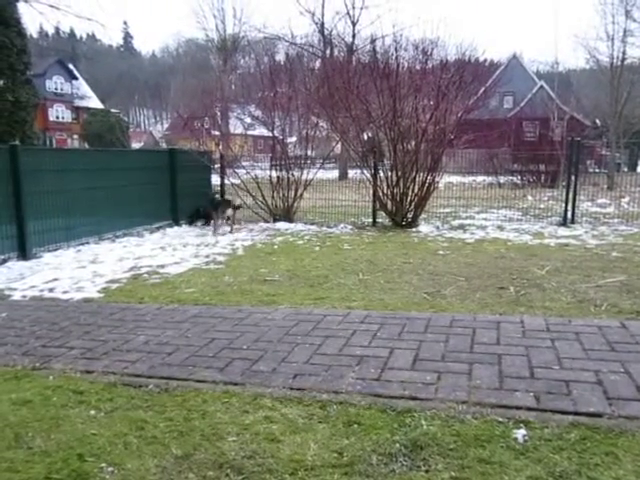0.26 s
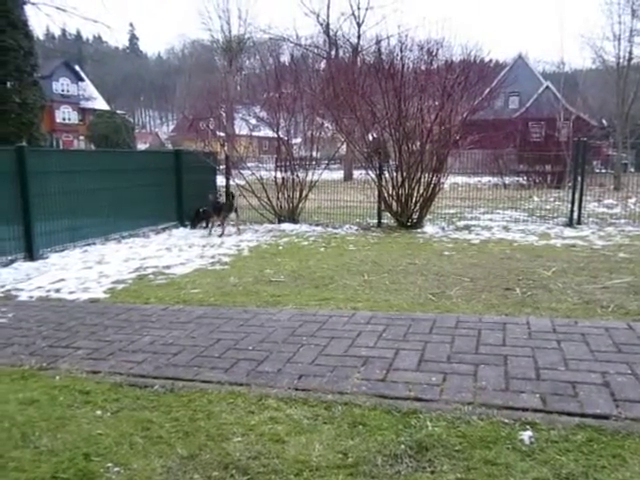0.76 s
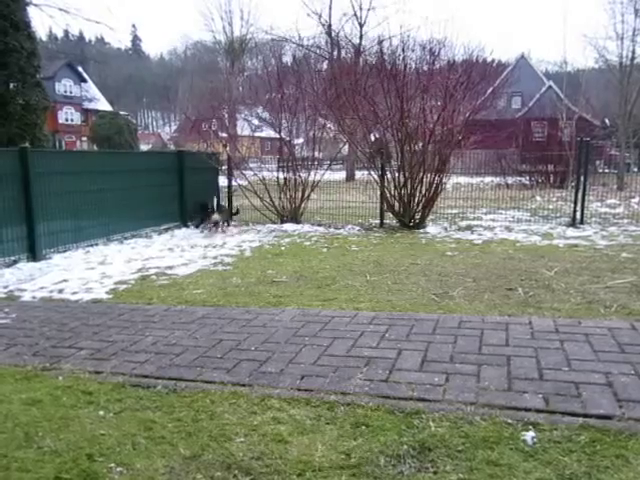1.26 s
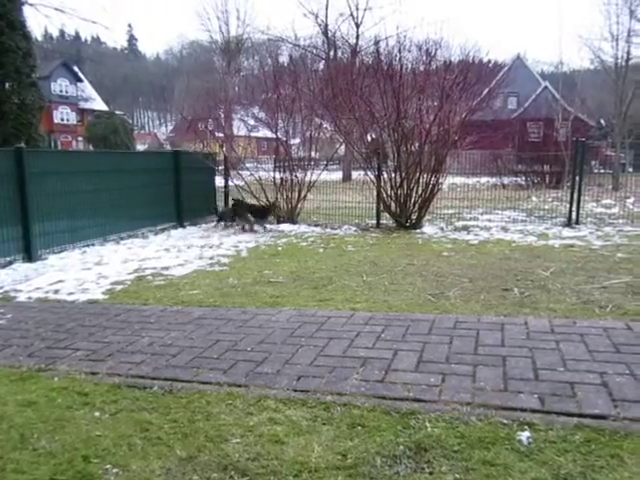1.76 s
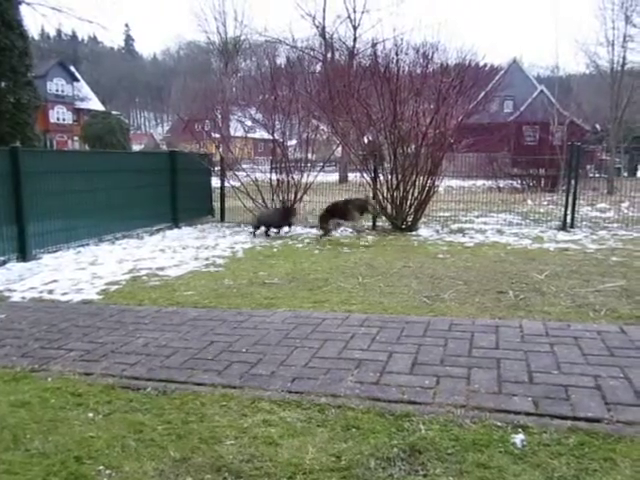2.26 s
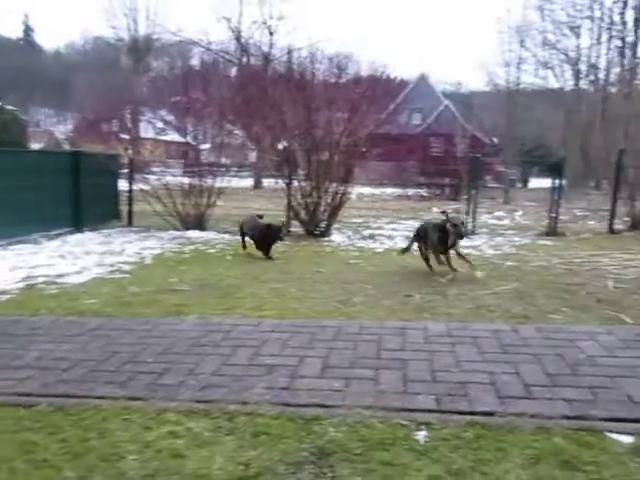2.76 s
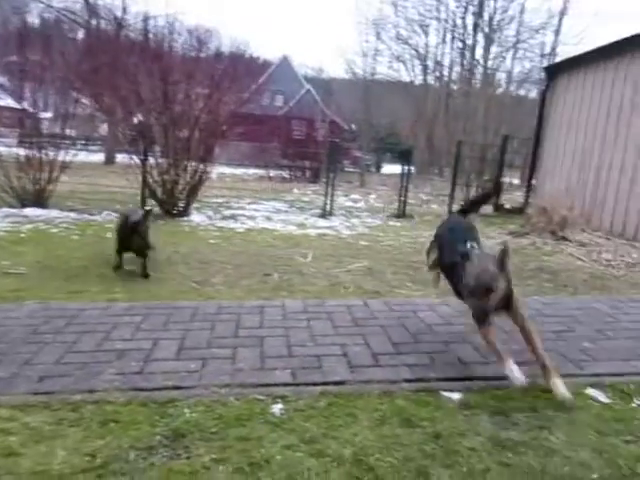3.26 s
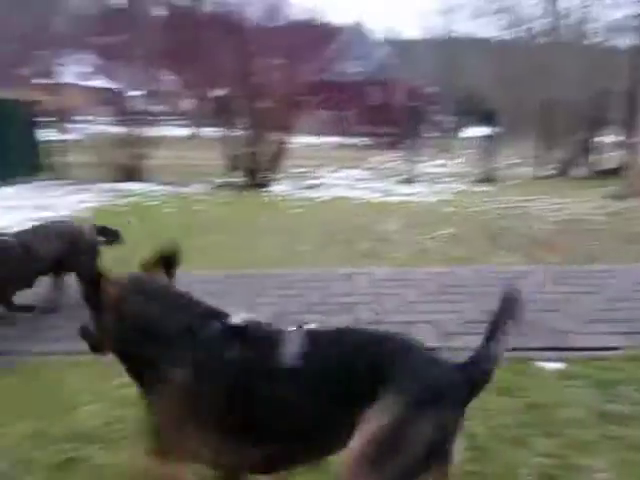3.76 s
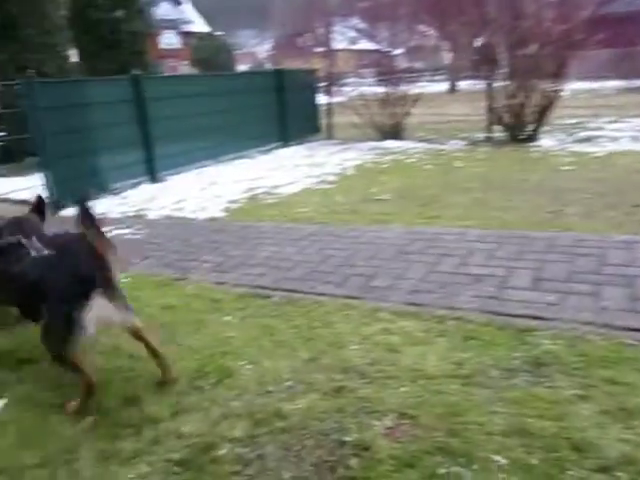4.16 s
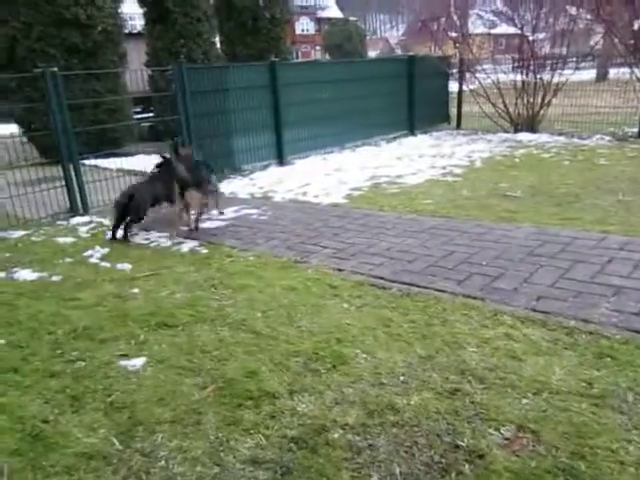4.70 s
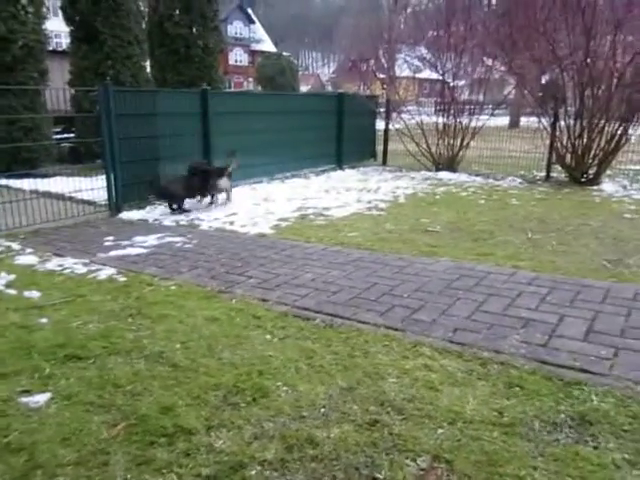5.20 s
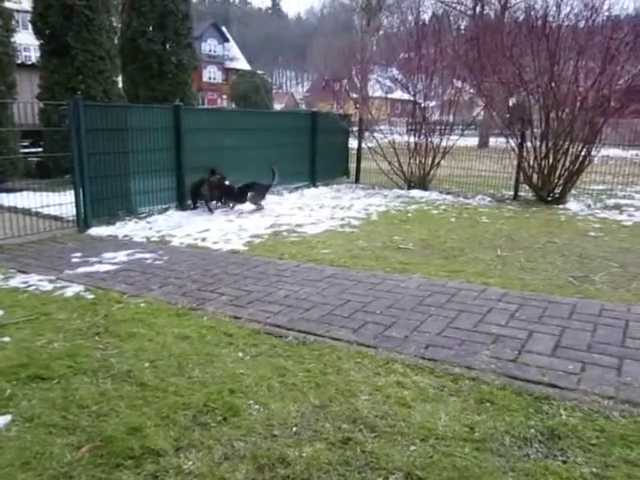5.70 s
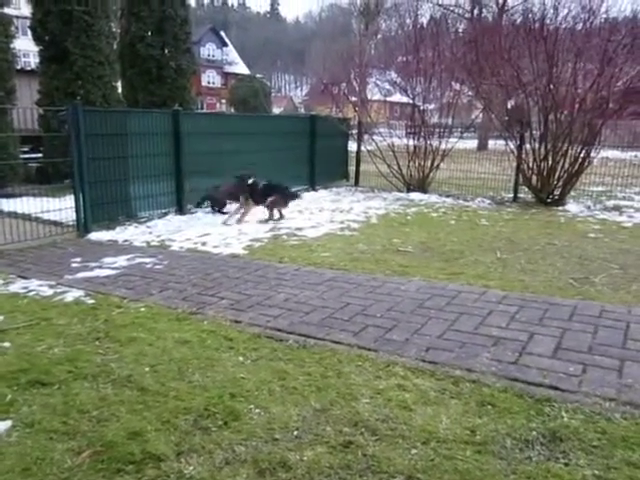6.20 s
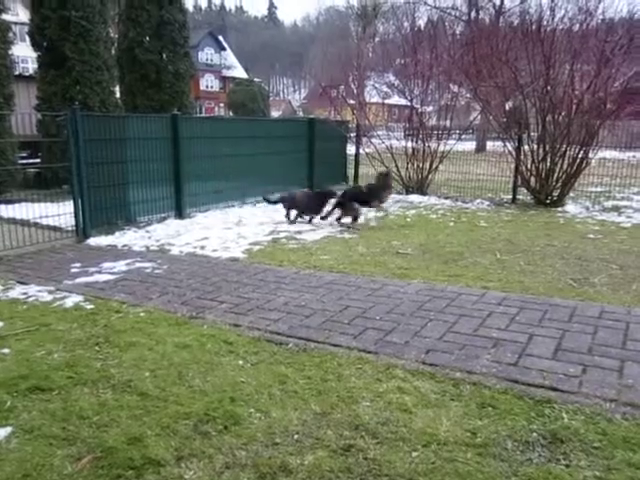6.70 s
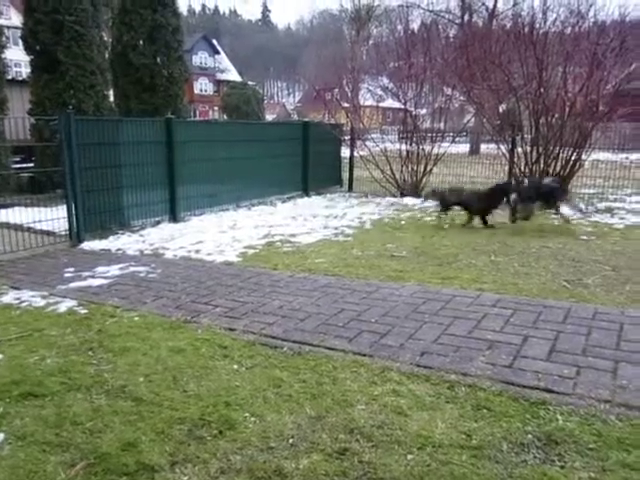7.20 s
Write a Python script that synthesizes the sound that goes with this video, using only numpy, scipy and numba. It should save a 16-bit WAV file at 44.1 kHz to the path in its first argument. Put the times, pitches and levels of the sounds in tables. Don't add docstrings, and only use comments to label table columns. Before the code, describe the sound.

Outdoors, a small stereo microphone picks up low wind rumble and faint town hiss, with occasional thin sparrow whistles. Dogs thump and growl in turn, then gallop nearer with crackling steps, skids and tinkling collar tags, one hard click striking the microphone itself. After the close pass come a short bark, raspy open-mouthed growls, a long fading growl and several gruff barks, the last one strong, amid continuing crunchy scuffling.

```python
import sys
import numpy as np
from scipy import signal
from scipy.fft import rfft, irfft
from scipy.io import wavfile
from scipy.ndimage import uniform_filter1d
from numba import njit

SR = 44100
rng = np.random.default_rng(int(sys.argv[2]) if len(sys.argv) > 2 else 0)


def how_loud(loudness_db):
    steps = np.asarray(loudness_db, float) / 20
    return 10 ** steps


def master_out(mix):
    frames = np.transpose(np.atleast_2d(mix))
    ceiling = np.clip(frames, -1, 1)
    pcm = np.round(ceiling * 32767).astype(np.int16)
    wavfile.write(sys.argv[1], SR, pcm)


N = 328525
T = np.arange(N) / SR
PORT_LAG = 1.25

# start in seconds, tag peak in dB, upper tag ring in dB relative to it, paw crunch in dB.
LANDINGS = [(0.2848, -34, -13, -42), (0.316, -25.5, -6, -39), (0.361, -25, 1, -36), (2.0297, -27, -8, -32),
            (2.247, -30, -3, -35), (2.272, -28.5, -8, -39), (2.368, -46, -8, -37), (2.5565, -27.5, -6, -33),
            (2.885, -40, -6, -34), (3.085, -47, -6, -33), (3.3, -17, -13, -40), (3.317, -22, -7, -42),
            (3.6067, -24.5, -1, -40), (4.04, -41, -12, -50), (4.192, -32, -16, -35), (4.351, -46, 3, -24),
            (4.7997, -36, 4, -29), (4.857, -32, 8, -27.5), (5.109, -27, 8, -34), (5.204, -29, 3, -31.5),
            (5.334, -32, 3, -30), (5.4186, -23, 6, -31), (5.51, -30.5, -13, -46), (5.6002, -23, -17, -47),
            (5.761, -21, -7, -23), (5.854, -30.5, -18, -35), (6.629, -36, -5, -33), (6.946, -36, -15, -39),
            (7.3239, -34.5, -2, -49)]
# frequency in Hz, level in dB per Hz.
RUSTLE = [(180, -61), (300, 4), (637, -41), (861, -8), (1570, -10.5), (8100, -8.5), (12100, -1.5),
          (15000, -7), (16400, -8)]


@njit
def svf(x, hz, width):
    y, b, l = np.empty(len(x)), 0., 0.
    for i in range(len(x)):
        g, k = np.tan(np.pi * hz[i] / SR), width / hz[i]
        v = (b + g * (x[i] - l)) / (1 + g * (g + k))
        b, l, y[i] = 2 * v - b, l + 2 * g * v, k * v
    return y


def band(x, hz, width):
    return svf(x, hz * np.ones(len(x)), 1. * width)


def unit(x):
    return x / np.sqrt(np.mean(x ** 2))


def walk(rate, count=N):
    k = int(SR / rate)
    steps = np.repeat(rng.standard_normal(count // k + 1), k)
    return 1.34 * uniform_filter1d(uniform_filter1d(steps, k), k)[:count]


def colour(x, table):
    hz, db = np.transpose(table)
    bins = np.log(np.fft.rfftfreq(N, 1 / SR) + 1)
    return irfft(rfft(x) * how_loud(np.interp(bins, np.log(hz), db)), N)


def spikes(s, size):
    places = np.clip((np.ravel(s) * SR).astype(int), 0, N - 1)
    return np.bincount(places, np.ravel(size), N)


def fade(x, rise, fall):
    falling = signal.lfilter([1], [1, -np.exp(-1 / (fall * SR))], x)
    return uniform_filter1d(falling, int(rise * SR) + 1)


def swells(table):
    return sum(how_loud(db) * np.exp(-(2 * (T - s) / length) ** 2) for s, db, length in table)


def ring(x, modes):
    out = np.zeros(len(x))
    for hz, db, t60 in modes:
        pole = np.exp(2j * np.pi * hz / SR - np.log(1000) / (t60 * SR))
        out += how_loud(db) * signal.lfilter([1], [1, -pole], x).imag
    return out


def built_ring(x, modes, swell_s, share):
    short_modes = [(hz, db, swell_s) for hz, db, _ in modes]
    return ring(x, modes) - share * ring(x, short_modes)


def town():
    # frequency in Hz, level in dB per Hz.
    hiss_tone = [(15, -41), (25, -2), (65, -15), (134, -2), (432, -6), (508, -7), (948, -6), (2730, -16.5),
                 (3880, -17), (5530, -21), (13900, -26.5), (16400, -22)]
    mid, side = (colour(rng.standard_normal(N), hiss_tone) for _ in range(2))
    mixed = np.array([mid + 0.78 * side, mid - 0.73 * side])
    patches = np.zeros((2, N))
    for hz in 45 * 2 ** np.arange(9.):
        drift_db = 1.8 * walk(3.956)
        patches += how_loud(drift_db) * np.array([band(x, hz, hz * 1.3) for x in mixed])
    whine = how_loud(-74) * np.sin(2 * np.pi * 15734 * T)
    return how_loud(-41.5) * unit(patches) + whine


def wind():
    # middle in seconds, level in dB, length in seconds.
    gusts = [(.1, -46, 0.68), (.45, -43, 0.22), (1.37, -52, 0.31), (1.8, -53, 0.32), (2.08, -36, 0.15),
             (2.45, -38, 0.097), (2.9, -55, 0.64), (4.15, -43, 0.48), (5.0, -51, 0.71), (5.83, -55, 0.11),
             (6.27, -56, .15), (7.0, -50, 1.4)]

    def rumble():
        centre = 62 * (1 + 0.064 * walk(3.3))
        return unit(band(band(rng.standard_normal(N), centre, 65), 75.0, 85))

    mid, side = rumble(), rumble()
    strength = (how_loud(-51) + swells(gusts)) * how_loud(2 * walk(14))
    return strength * np.array([mid + 0.43 * side, mid - 0.11 * side])


def crackle(spread_db, share):
    size_db = spread_db * np.minimum(rng.exponential(size=N), 5)
    grains = (rng.random(N) < share) * how_loud(size_db) * rng.standard_normal(N)
    return unit(unit(grains) + 1.38 * rng.standard_normal(N))


def rustle():
    # time in seconds, level in dB.
    scuffle = [(0.0, -55), (0.83, -88), (1.26, -61.5), (2.03, -54.5), (2.4, -53.5), (2.9, -61.5),
               (3.38, -53), (3.66, -52.5), (3.71, -43), (3.9, -43.5), (4.0, -49), (4.71, -47), (5.04, -51),
               (5.91, -49.5), (6.06, -57.5), (6.74, -46.5), (7.16, -59.5), (7.45, -53.5)]
    # middle in seconds, level in dB, length in seconds.
    skids = [(1.919, -46.5, 0.11), (2.16, -44, 0.059), (2.328, -41.5, 0.062), (2.8, -42, 0.035),
             (2.937, -41, 0.072), (4.81, -41, 0.018), (5.16, -36.5, 0.06), (5.786, -34, 0.081),
             (6.15, -40.5, 0.057), (6.295, -46, 0.043), (6.893, -45, 0.027)]
    scuffle_db = np.interp(T, *np.transpose(scuffle))
    scrapes = how_loud(scuffle_db + 7 + 3.2 * walk(40))
    return (scrapes + swells(skids)) * unit(colour(crackle(4.6, .08), RUSTLE))


def tags():
    # start in seconds, peak in dB, upper ring in dB relative to it.
    chinks = [(0.0992, -35, -12), (2.0358, -19, -10), (3.289, -30, -6), (3.334, -40, -8),
              (3.614, -32.5, -8), (3.7913, -7.5, -5), (3.809, -11, -4), (3.833, -21, -2), (3.9908, -35, -2),
              (4.214, -26, -12), (4.2183, -21, -20), (4.2522, -34, -16), (6.6453, -30, -2),
              (6.89, -35, -15)]
    # frequency in Hz, level in dB, time to fall by 60 dB in seconds.
    main_modes = [(9920, 1, .052), (9850, -9, .04), (5900, -20, .05), (11600, -28, .05)]
    # Hz, dB, seconds.
    upper_modes = [(13400, 4.5, .04), (13300, -3, .03), (13520, -6, .03)]
    s, db, upper_db = np.transpose([row[:3] for row in LANDINGS] + chinks)
    chance = rng.random((len(s), 2, 3))
    gaps = .006 + .012 * chance[:, 0]
    times = np.c_[s, s[:, None] + np.cumsum(gaps, axis=1)]
    sizes = how_loud(db)[:, None] * np.c_[np.ones(len(s)), .35 * chance[:, 1]]
    upper_sizes = sizes * how_loud(upper_db)[:, None]
    main = built_ring(spikes(times, sizes), main_modes, swell_s=.014, share=.7)
    upper = built_ring(spikes(times, upper_sizes), upper_modes, swell_s=.014, share=.7)
    spun = main * how_loud(2 * walk(120)) + upper * how_loud(2 * walk(120))
    return band(spun, 9100, 24000)


def paws():
    # start in seconds, peak in dB, dull part in dB relative to it.
    steps = [(0.45, -45, -6.5), (1.909, -39.5, -1), (1.739, -37, -26), (2.1326, -41, -16),
             (2.387, -28, -33), (2.466, -31.5, -9.5), (2.678, -29.5, -13.5), (3.0132, -32, -16),
             (3.066, -36.5, -5), (3.1876, -33, -29), (3.48, -44.5, 5.5), (3.648, -46.5, -1),
             (3.6892, -39, -23), (3.703, -27, -23), (3.7356, -24, -15.5), (3.7894, -19.5, -29),
             (3.849, -24, -38), (3.876, -23, -42), (3.919, -28.5, -12), (4.011, -31, -36),
             (4.2125, -36, -30), (4.2524, -51, -25), (4.67, -31.5, -10), (4.682, -27, -24),
             (4.75, -27.5, -16), (4.9443, -38, -33), (4.955, -35, -37), (4.9848, -40, -39),
             (5.041, -29, -24), (5.0905, -33, -7.5), (6.094, -32, -19), (6.5492, -27.5, -34),
             (6.645, -24, -25), (6.853, -28.5, -21), (6.868, -28, -31)]
    landing_dull_db = -15.5
    s, db, dull_db = np.transpose(steps + [(s, db, landing_dull_db) for s, _, _, db in LANDINGS])
    hits = spikes(s, how_loud(db))
    crack_and_crunch = fade(hits, 0.0025, 0.0036) + how_loud(-9) * fade(hits, 0.0096, 0.0076)
    crisp = crack_and_crunch * unit(colour(crackle(4.2, 0.069), RUSTLE[3:]))
    dull_envelope = fade(spikes(s, how_loud(db + dull_db)), 0.0028, 0.045)
    dull = dull_envelope * unit(band(rng.standard_normal(N), 3040, 1800))
    return how_loud(1.0) * crisp + how_loud(-0.5) * dull


def thuds():
    # start in seconds, peak in dB, pitch in Hz. The rows from 1.335 to 1.385 s are a low band of the
    bumps = [(0.325, -31, 350), (0.357, -29.5, 366), (0.392, -25, 285), (0.449, -26.5, 1020),
             (0.498, -50, 293), (1.335, -17, 265), (1.36, -17, 260), (1.385, -13, 265), (1.91, -28, 700),
             (2.043, -23, 358), (2.88, -28.5, 1640), (3.079, -26, 320), (3.481, -27.5, 395),
             (3.618, -34, 1050), (3.754, -25.5, 345), (3.896, -26, 870), (4.368, -36, 865),
             (6.154, -27, 475), (6.795, -27, 293)]
    s, db, hz = np.transpose(bumps)
    latest = np.clip(np.searchsorted(s, T + .01) - 1, 0, None)
    noise = unit(band(rng.standard_normal(N), hz[latest], 170))
    return how_loud(-8.5) * fade(spikes(s, how_loud(db)), 0.00035, 0.014) * noise


def sparrows():
    # time in seconds, pitch in Hz, level in dB.
    chirrup = [(0, 3400, 4), (.03, 4610, 12), (.06, 3400, 8), (.07, 3774, 14), (.087, 3550, 12),
               (.11, 4154, 7.5), (.127, 3320, 13.5), (.137, 3900, 19), (.165, 3800, -28)]
    cheep = [(0, 4810, 8), (.02, 4665, 18), (.04, 4330, 21.5), (.07, 4250, 2), (.09, 4010, -23)]
    peep = [(0, 3330, -12), (.03, 3290, 12), (.22, 3300, -2.5), (.28, 3330, -16)]
    tswee = [(0, 4205, 13), (.045, 4590, 16), (.075, 4650, -10)]
    arch = [(0, 4080, 16), (.018, 4900, 14), (.035, 5200, 9), (.052, 4050, 13), (.085, 3950, -7)]
    # start in seconds, level in dB, pitch factor, length factor.
    chirrup_calls = [(0.894, -61.5, 1.02, 0.8), (2.4, -49, 1.035, 0.9), (6.757, -57, 1.03, 0.99)]
    cheep_calls = [(1.545, -65, 1, 0.89), (1.65, -69, .88, 0.54), (0.914, -68, 1.02, 0.48),
                   (5.76, -58, 1.1, 0.55), (5.761, -55, 0.68, 0.62)]
    peep_calls = [(3.508, -47.5, .78, 0.11), (2.6, -53, .8, 0.18), (5.788, -53.5, 1.01, 1)]
    tswee_calls = [(3.35, -65, 1.02, 1.15), (3.44, -59, 0.87, 0.9), (4.534, -53, 1.04, 0.52),
                   (5.57, -54, .97, 0.71), (6.768, -53.5, 1.02, 0.75)]
    arch_calls = [(5.451, -53, 1.0, 0.76)]
    # middle in seconds, level in dB, length in seconds.
    scolds = [(2.31, -40, 0.033), (2.345, -51, 0.033), (2.8, -49, .05), (5.78, -42, .04),
              (6.9, -48.5, 0.13)]
    repertoire = ((chirrup, chirrup_calls), (cheep, cheep_calls), (peep, peep_calls),
                  (tswee, tswee_calls), (arch, arch_calls))
    out = np.zeros(N)
    for shape, calls in repertoire:
        s, hz, db = np.transpose(shape)
        for start, call_db, pitch, length in calls:
            t = np.arange(int(s[-1] * length * SR)) / SR
            a = int(start * SR)
            warble = 1 + .026 * walk(700)[a:a + len(t)]
            f = pitch * np.interp(t / length, s, hz) * warble
            level = how_loud(call_db + np.interp(t / length, s, db))
            out[a:a + len(t)] += level * np.sin(2 * np.pi * np.cumsum(f) / SR)
    rasp = unit(band(band(rng.standard_normal(N), 3570, 1000), 3570, 1200))
    return out + swells(scolds) * rasp


@njit
def folds(hz, stretch, size):
    pulses, phase, p, k = np.zeros(len(hz) + 1), np.empty(len(hz)), 0., 0
    for i in range(len(hz)):
        step = hz[i] * stretch[k] / SR
        p += step
        if p >= 1:
            p, k = p - 1, k + 1
            pulses[i] += size[k] * p / step
            pulses[i + 1] += size[k] * (1 - p / step)
        phase[i] = p
    return pulses[:-1], phase


def growl(curve, rough, dog, tract, chest_hz):
    # start in seconds, added level in dB.
    pushes = [(1.376, 6), (1.449, 11), (1.649, 2), (1.76, 15), (4.157, 3), (4.445, 4), (4.462, 8.5),
              (4.475, 1), (4.492, 7), (4.551, 7), (5.17, 5.5), (5.228, 10), (5.247, 7), (5.392, 2),
              (5.44, 4), (5.539, 5), (5.674, 8), (5.775, 14), (6.194, 10), (6.625, 11.5), (6.632, 6),
              (6.69, 6), (7.037, 1.5), (7.373, 11), (7.4, 9), (7.417, 12)]
    # centre in Hz, width in Hz, level in dB.
    mouth_modes = [
        [(481, 27, 9), (663, 134, 12), (829, 140, 6)],
        [(553, 150, -1), (707, 133, -4.5), (899, 34, -7), (1127, 36, -8)],
    ]
    # centre in Hz, width in Hz, level in dB.
    rasp_modes = [(1784, 130, 6), (2740, 350, 3.5), (3400, 1300, -4.5), (4610, 1200, -14)]
    # middle in seconds, level in dB, length in seconds, centre in Hz.
    curls = np.array([(1.422, -56, .06, 2050), (1.516, -48.5, .07, 2030), (4.15, -42, 0.04, 1850),
                      (4.173, -44, 0.034, 1790), (4.434, -39.5, .03, 2150), (4.49, -35, 0.037, 1380),
                      (4.519, -38, 0.035, 1720), (4.584, -42, .04, 2150), (4.597, -36.5, 0.075, 2490),
                      (5.172, -45, 0.05, 1880), (5.242, -45, 0.036, 1770), (5.394, -44, .05, 1760),
                      (5.468, -38, 0.076, 1840), (5.542, -36, 0.043, 1690), (5.611, -40.5, 0.048, 1740),
                      (5.67, -32, 0.04, 1730), (5.827, -45, 0.14, 1860), (6.247, -44, 0.085, 2500),
                      (6.597, -43, .03, 2880), (6.63, -43, 0.036, 1840), (6.714, -47, 0.067, 2620),
                      (7.034, -50, .03, 2900), (7.07, -46, 0.043, 2380), (7.414, -48, 0.03, 3030),
                      (7.445, -49, 0.027, 2870)])
    # middle in seconds, level in dB, length in seconds.
    rushes = [(4.158, -38.5, 0.054), (4.21, -47, 0.027), (4.59, -39, 0.16), (5.24, -47, 0.027),
              (5.53, -47, 0.28), (5.68, -44, 0.042), (6.25, -44, 0.08), (6.61, -50, 0.046),
              (7.06, -49, .06), (7.428, -41, .06)]
    throat_rest_hz = [383, 280]
    chest_db_per_open = [3, 12.5]

    s, *columns = np.transpose(curve)
    a, b = int(s[0] * SR), min(int(s[-1] * SR), N)
    t, count = T[a:b], b - a
    hz, db, opening = (np.interp(t, s, column) for column in columns)
    db = db + fade(spikes(*np.transpose(pushes)), 0.0022, 0.0049)[a:b]
    chest_db, start_hz, end_hz, rasp_hz, rasp_db = tract

    chance = np.clip(rng.standard_normal((600, 2)).T, -1.6, 1.6)
    weak_db = -9 * (np.arange(600) % 2)
    wandering_hz = hz * (1 + .08 * rough * walk(30, count=count))
    pulse_sizes = how_loud(weak_db + 7.5 * rough * chance[1])
    pulses, phase = folds(wandering_hz, np.exp(.2 * rough * chance[0]), pulse_sizes)
    voice = unit(pulses - pulses.mean())

    def breath():
        return unit(np.exp(-phase / 0.6) * rng.standard_normal(count))

    def flutter():
        return how_loud(2.3 * rough * walk(70, count=count))

    def twice(x, f, width):
        return band(band(x, f, width), f, 0.42 * width)

    def hollows(x, modes):
        return sum(how_loud(g_db) * flutter() * twice(x, f, w) for f, w, g_db in modes)

    chest = twice(.5 * voice + 1.2 * breath(), chest_hz, 200)
    throat_hz = hz + 0.038 * (throat_rest_hz[dog] - hz)
    throat = twice(voice + rough * breath(), throat_hz, 155)
    husky = voice + 1.2 * rough * breath()
    jaw_tremble = 1 + .1 * walk(45, count=count)
    mouth_hz = np.interp(t, s[[0, -1]], [start_hz, end_hz]) * jaw_tremble
    mouth = twice(husky, mouth_hz, 280) + hollows(husky, mouth_modes[dog])
    moving_rasp_hz = rasp_hz * (mouth_hz / mouth_hz.mean()) ** 0.45
    rasp = how_loud(-4.5) * twice(husky, moving_rasp_hz, 960) + hollows(husky, rasp_modes)
    snarl = twice(husky, np.interp(t, curls[:, 0], curls[:, 3]), 680)
    teeth = twice(0.35 * voice + breath(), 2780, 4300)

    attack_s, release_s = 0.063, 0.083
    drone = np.clip(np.minimum((t - s[0]) / attack_s, (s[-1] - t) / release_s), 0, 1) * how_loud(chest_db)
    chest_gain = drone * how_loud(chest_db_per_open[dog] * (opening - 0.89))
    mouth_gain = how_loud(db - 23 + 32.5 * opening)
    surge_db = 2.2 * walk(29.0, count=count)
    rasp_gain = drone * how_loud(rasp_db + 1.0 + surge_db + 19.5 * (opening - 1.77))
    parts = ((throat, how_loud(db)), (chest, chest_gain), (mouth, mouth_gain), (rasp, rasp_gain),
             (snarl, swells(curls[:, :3])[a:b]), (teeth, swells(rushes)[a:b]))
    edge = np.clip(np.minimum(t - s[0], s[-1] + 0.014 - t) / 0.018, 0, 1)
    out = np.zeros(N)
    out[a:b] = edge * sum(gain * unit(flutter() * x) for x, gain in parts)
    return out


def bark(s, hold, db, hz, opening):
    times = s + np.cumsum([0, 0.04, hold, 0.074])
    pitch = hz * np.array([1, 1, 1, 0.93])
    effort = db - 26.5 * np.array([1, 0, 0, 1])
    jaws = opening * np.array([1, 1, 0.87, 0.87])
    return np.c_[times, pitch, effort, jaws]


def dogs():
    # time in seconds, pitch in Hz, effort in dB, mouth opening 0-1.
    growl_curves = [
        [(1.315, 280, -38, 0.2), (1.35, 369.3, -30.5, 0.28), (1.382, 421.6, -25.5, 0.35),
         (1.42, 384.3, -27, 0.5), (1.46, 398, -28.5, 0.22), (1.5, 374, -33, 0.3), (1.58, 290, -35, 0.3)],
        [(1.5, 270.3, -38, .2), (1.57, 280, -36.5, .2), (1.615, 356, -32, 0.25), (1.66, 396.6, -27, 0.33),
         (1.705, 412.7, -27.5, 0.65), (1.77, 342.5, -33.5, 0.38), (1.86, 307, -29, 0.35), (1.93, 256, -45, 0.6),
         (1.99, 226, -54, 0.6)],
        [(4.42, 301.3, -58, 1), (4.462, 302.5, -23.5, 0.6), (4.5, 301.2, -26, 0.74), (4.54, 273.2, -37, 0.9),
         (4.578, 265.8, -32.5, 0.92), (4.614, 275.5, -30.5, 0.88), (4.71, 259.4, -65, 0.6)],
        [(5.1, 274, -61, 0.1), (5.15, 280, -27, 0.18), (5.24, 262.8, -41.5, 1), (5.33, 272.3, -41, 0.54)],
        [(5.27, 269.9, -42.5, 0.6), (5.44, 258.9, -42, 0.99), (5.57, 287.1, -33, 0.68),
         (5.65, 279.5, -34.5, 0.76), (5.735, 295.9, -29, 0.81), (5.79, 289, -36, 0.87),
         (5.89, 269.2, -25.5, 0.33), (6.04, 184.4, -53, 0.5)],
    ]
    # start in seconds, hold in seconds, effort in dB, pitch in Hz, mouth opening 0-1.
    bark_rows = [
        (4.117, 0.014, -33.5, 258.5, 0.78),
        (6.169, 0.052, -30.5, 258.9, 0.58),
        (6.578, 0.067, -30.5, 293.6, 0.81),
        (6.998, 0.014, -29, 271.4, 0.6),
        (7.326, 0.056, -25.5, 293, 0.56),
    ]
    roughness = [.52, .46, .7, .55, .58, .75, .75, .8, .75, .75]
    callers = [0, 0, 1, 1, 1, 1, 1, 1, 1, 1]
    # chest in dB, mouth at start in Hz, mouth at end in Hz, rasp in Hz, rasp in dB relative.
    tracts = [(-28, 910, 670, 2100, -11), (-32, 720, 630, 2400, 0), (-27.5, 693, 1470, 2140, 2),
              (-33, 880, 870, 1400, -6), (-33, 1020, 473, 1730, -1.5), (-33.5, 1290, 1200, 2630, 11),
              (-28, 450, 710, 2400, 2), (-27.5, 770, 500, 2100, -11), (-28, 735, 640, 2260, 3),
              (-31.5, 690, 710, 3000, 0)]
    chests = [180, 183, 146, 142, 137, 208, 126, 204, 135, 160]
    curves = growl_curves + [bark(*row) for row in bark_rows]
    return sum(growl(*call) for call in zip(curves, roughness, callers, tracts, chests))


def snaps():
    # start in seconds, peak in dB.
    breaks = [(1.4192, -36), (1.5294, -40), (1.6494, -52), (1.9094, -31), (2.0204, -38), (2.044, -31),
              (2.2448, -38), (2.2827, -36), (2.3441, -38), (2.3675, -28), (2.3855, -29), (2.4334, -46),
              (2.5546, -42), (2.6753, -40), (2.7681, -38), (2.7836, -40), (2.8809, -41), (2.9272, -39),
              (2.9414, -42), (3.085, -32), (3.6905, -30), (3.718, -29), (3.7344, -21), (3.8094, -29),
              (3.8434, -35), (3.8766, -31), (3.922, -28), (3.9344, -24), (3.9464, -22.5), (4.0126, -24),
              (4.2934, -44), (4.3136, -40), (4.352, -31), (4.6688, -32), (4.6818, -23), (4.7044, -37),
              (4.799, -21.5), (4.8144, -23), (4.8559, -19), (4.8944, -27), (4.9447, -32), (4.9572, -24),
              (4.9856, -28), (5.3124, -39), (5.4171, -32), (5.5623, -30), (5.7608, -28), (6.0916, -40),
              (6.6288, -34), (6.6864, -38), (6.7685, -43), (6.8039, -30), (6.8698, -33), (6.9461, -34),
              (6.9681, -35), (7.0369, -37), (7.0514, -31), (7.1447, -41), (7.3238, -41), (7.4011, -37)]
    s, db = np.transpose(breaks)
    tick = fade(spikes(s, how_loud(db + 0.5)), .0012, 0.0018)
    return tick * unit(band(rng.standard_normal(N), 10800, 14000))


def knock():
    # frequency in Hz, level in dB, time to fall by 60 dB in seconds.
    body_modes = [(365, -17, .04), (715, -6, .014), (940, -2, .016)]
    # Hz, dB, seconds.
    skin_modes = [(2270, -11, .007), (2850, -9, .008), (3120, -5, .014), (3580, -4, .012), (4200, -6, .007),
                  (8900, -7, .005), (10000, -10, .005), (12800, -14, .003)]
    hit = spikes([3.3865], [1.])
    body = band(built_ring(hit, body_modes, swell_s=.004, share=1), 600, 1300) * how_loud(9)
    skin = -ring(hit, skin_modes)
    left = skin + body
    right = -how_loud(-8) * np.roll(skin, 4) - how_loud(-10) * body
    return how_loud(-2) * np.array([left, right])


def ports(x, lag, pan_db=0.):
    late = irfft(rfft(x) * np.exp(-2j * np.pi * np.fft.rfftfreq(N) * lag), N)
    return np.array([x * how_loud(pan_db / 2), late * how_loud(-pan_db / 2)])


def yard(x, t60, db):
    t = T[:SR // 2]
    tail = rng.standard_normal((2, len(t))) * np.exp(-np.log(1000) * t / t60) * (t > .008)
    tail = tail / np.sqrt((tail ** 2).sum(1, keepdims=True))
    return how_loud(db) * signal.fftconvolve(x[None], tail, axes=1)[:, :N]


def scene():
    voices = dogs() + thuds()
    feet = paws() + snaps() + rustle()
    metal, birds = tags(), sparrows()
    near = ports(voices, PORT_LAG, pan_db=-0.5) + ports(feet, PORT_LAG, pan_db=-1.1)
    near = near + ports(metal, PORT_LAG, pan_db=-1.0) + ports(birds, -0.88, pan_db=2.0)
    echoes = yard(voices, 0.24, db=-10) + yard(feet + metal, 0.034, db=-10.5) + yard(birds, .3, db=1.0)
    return near + echoes + knock() + town() + wind()


def roll_off(x):
    return signal.sosfilt(signal.butter(12, 16510, fs=SR, output="sos"), x)


def record(dry):
    shelf = signal.ellip(6, .3, 20, 15850, fs=SR, output="sos")
    cut = signal.ellip(10, .3, 60, 16450, fs=SR, output="sos")
    clipped = np.clip(dry, -1, 1)
    return roll_off(signal.sosfilt(np.r_[shelf, cut], clipped))


dry = scene()
out = record(dry)
master_out(out)
```